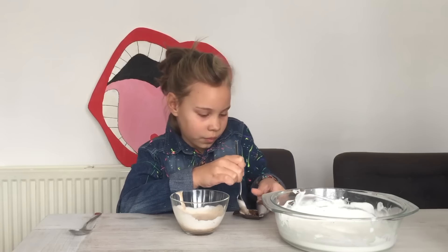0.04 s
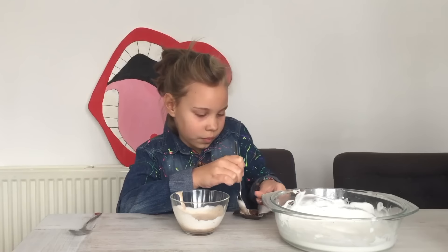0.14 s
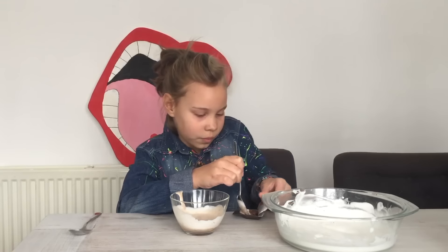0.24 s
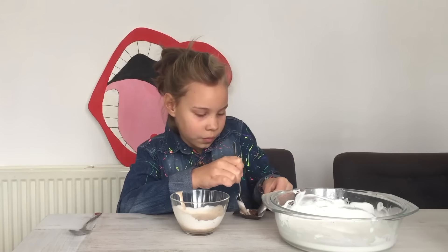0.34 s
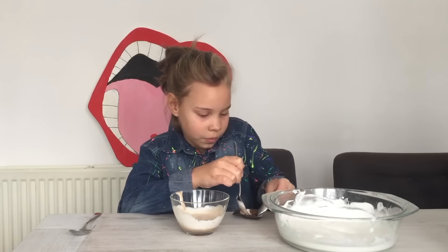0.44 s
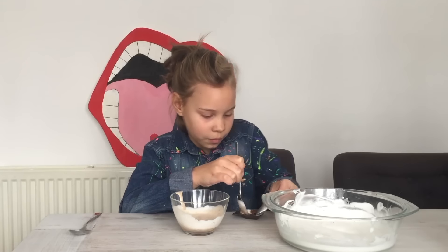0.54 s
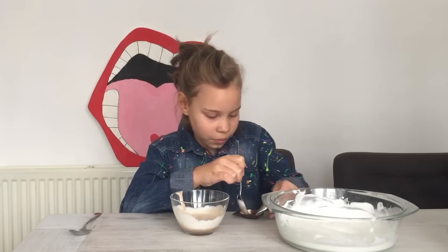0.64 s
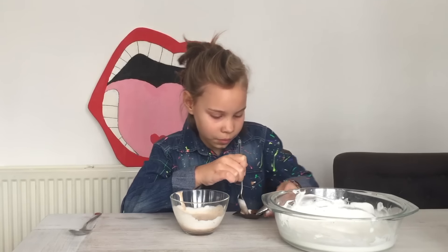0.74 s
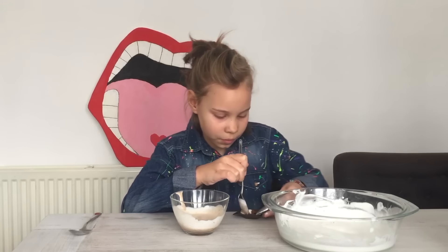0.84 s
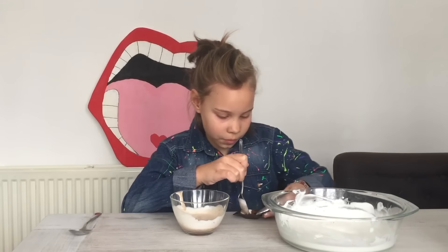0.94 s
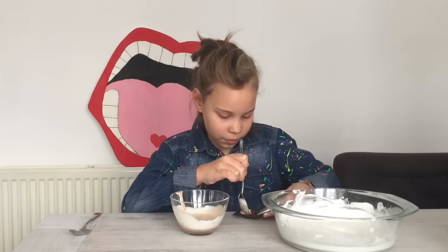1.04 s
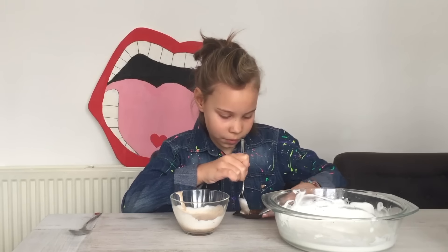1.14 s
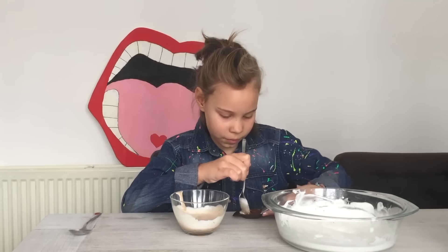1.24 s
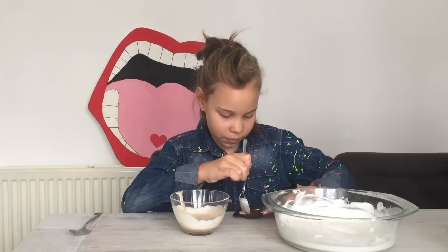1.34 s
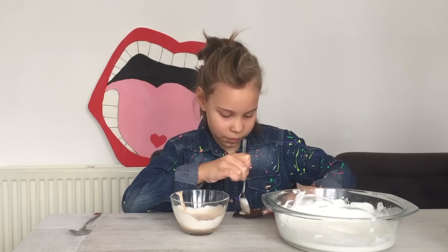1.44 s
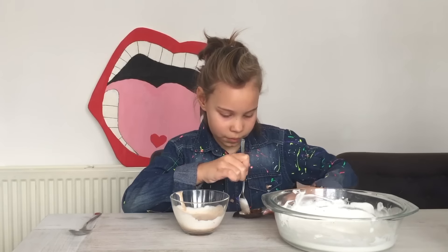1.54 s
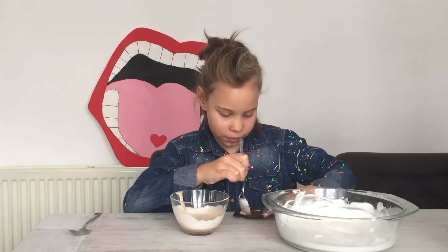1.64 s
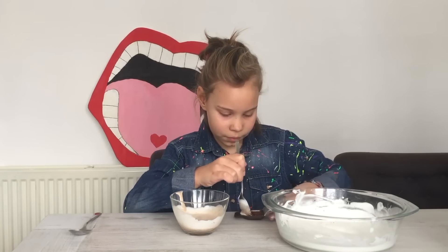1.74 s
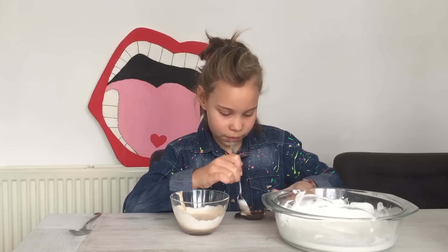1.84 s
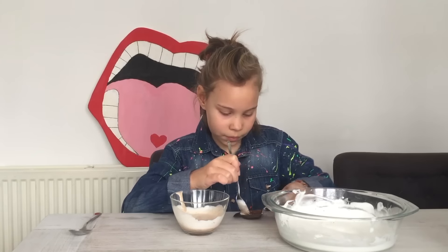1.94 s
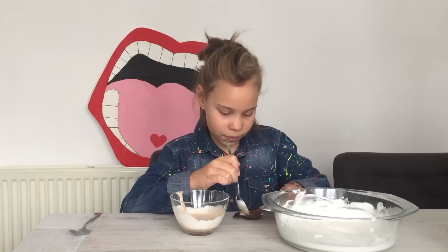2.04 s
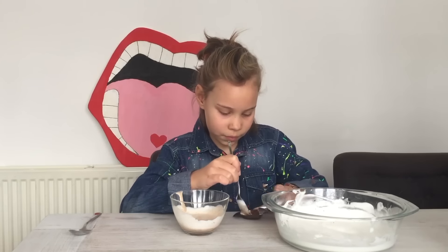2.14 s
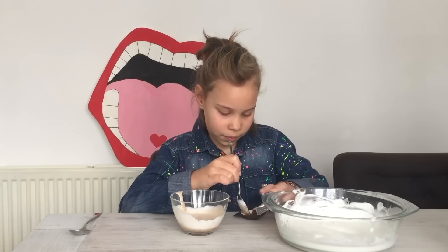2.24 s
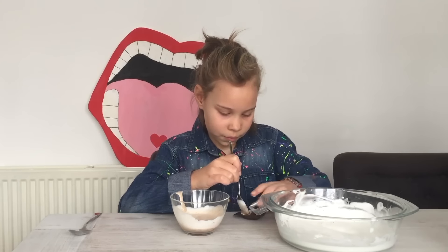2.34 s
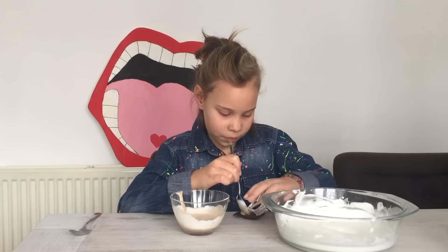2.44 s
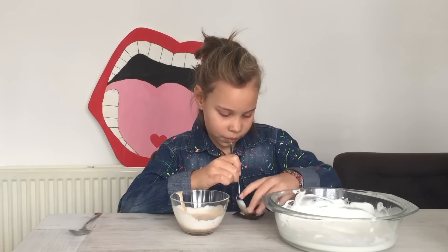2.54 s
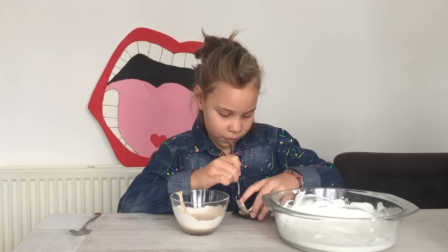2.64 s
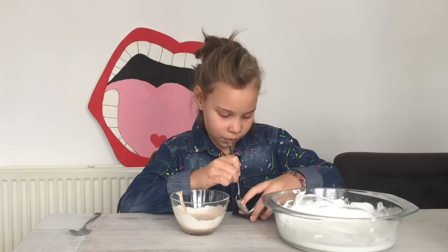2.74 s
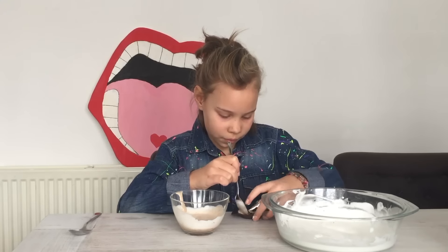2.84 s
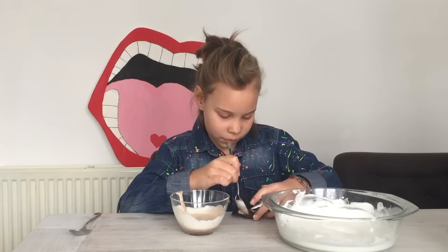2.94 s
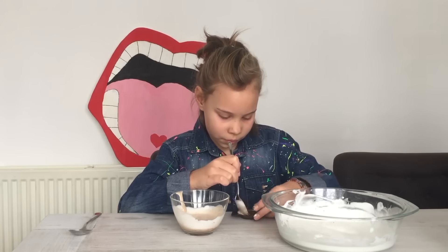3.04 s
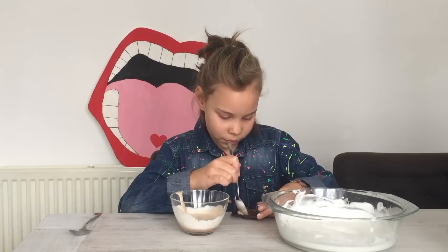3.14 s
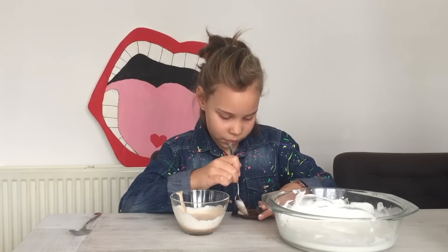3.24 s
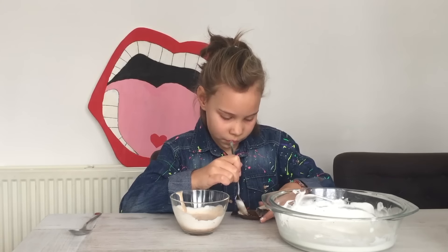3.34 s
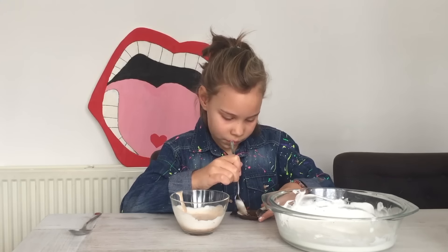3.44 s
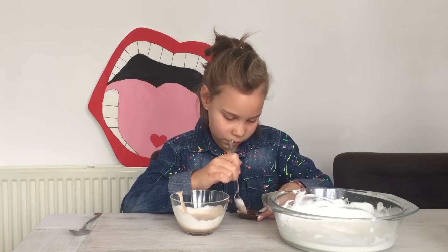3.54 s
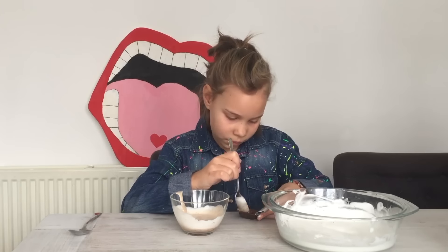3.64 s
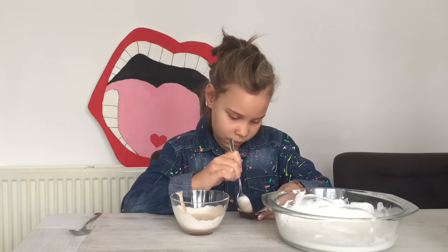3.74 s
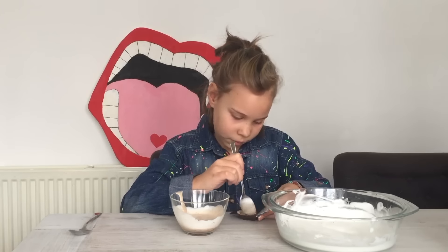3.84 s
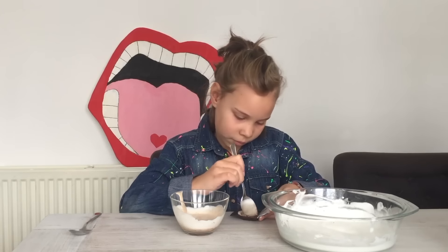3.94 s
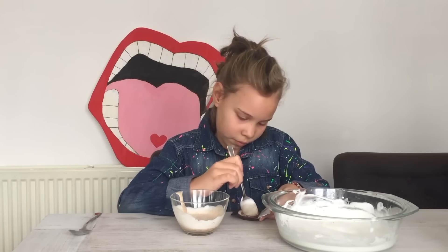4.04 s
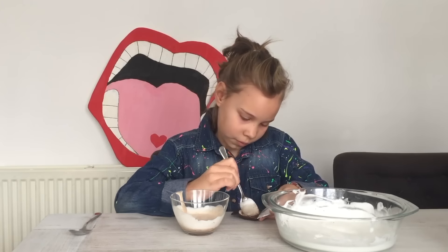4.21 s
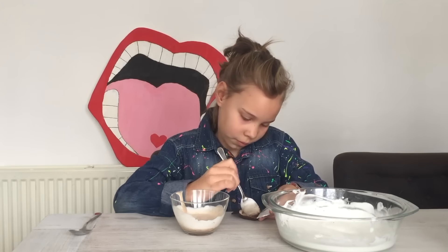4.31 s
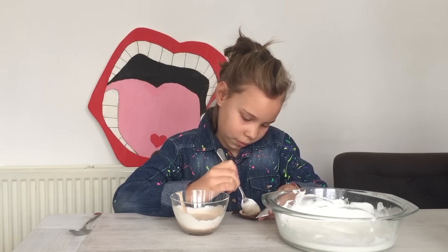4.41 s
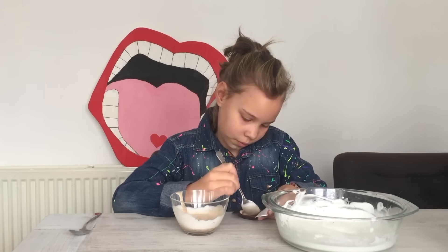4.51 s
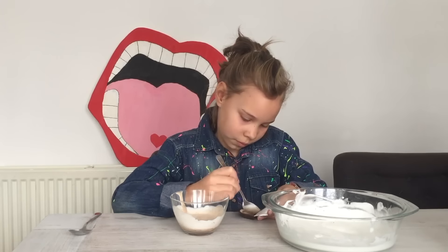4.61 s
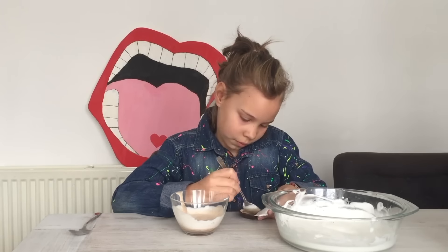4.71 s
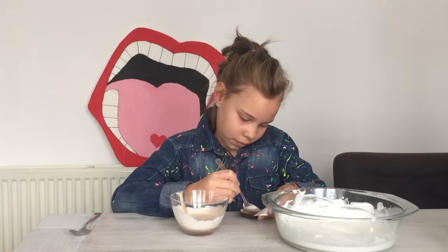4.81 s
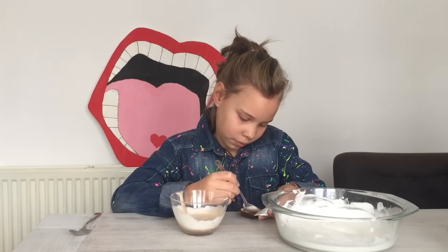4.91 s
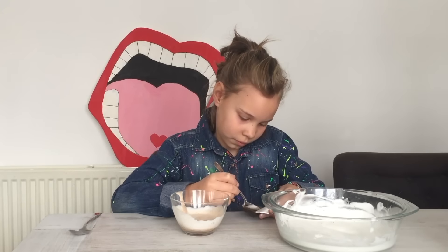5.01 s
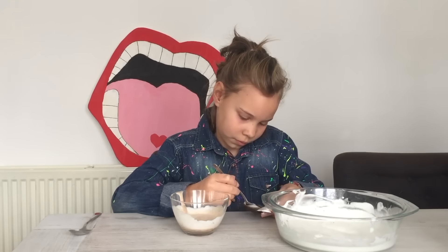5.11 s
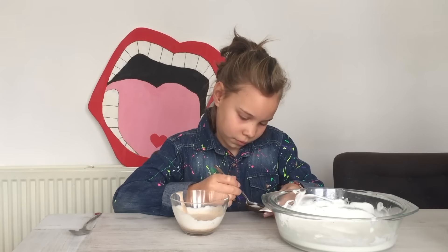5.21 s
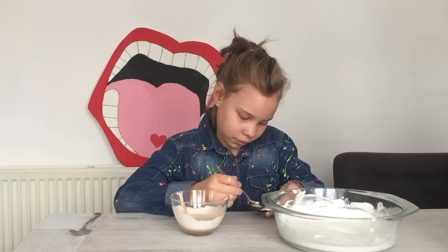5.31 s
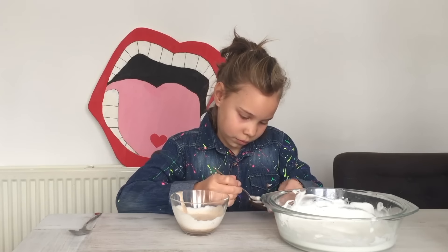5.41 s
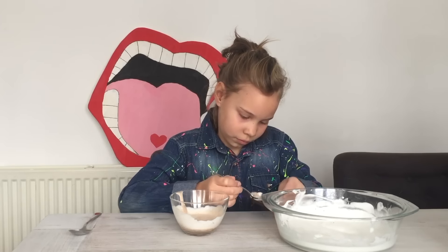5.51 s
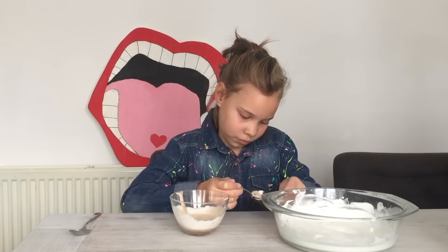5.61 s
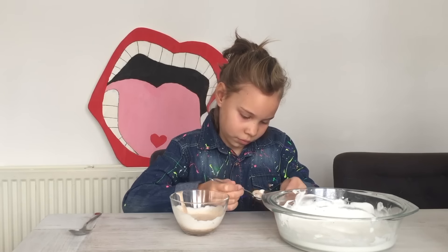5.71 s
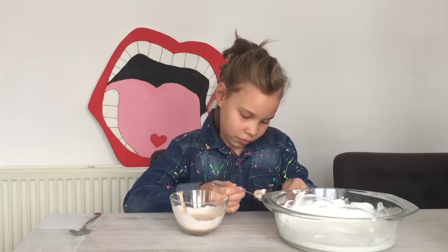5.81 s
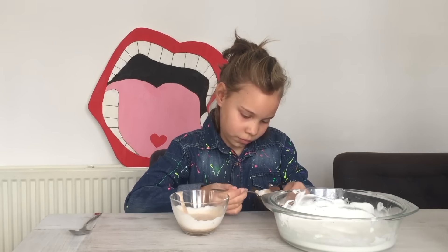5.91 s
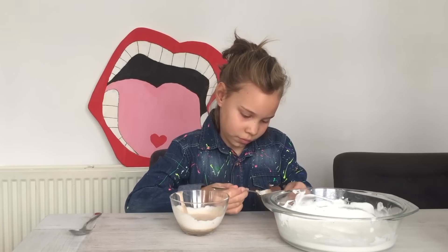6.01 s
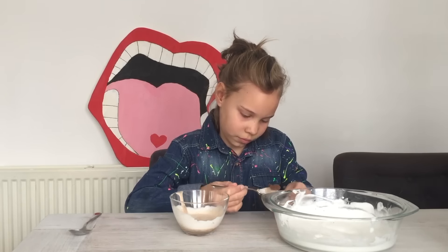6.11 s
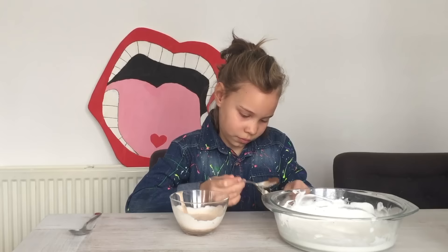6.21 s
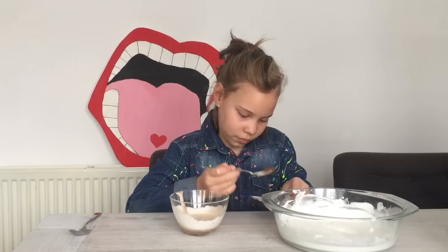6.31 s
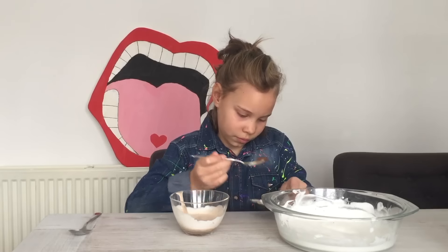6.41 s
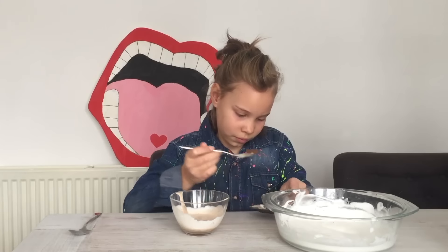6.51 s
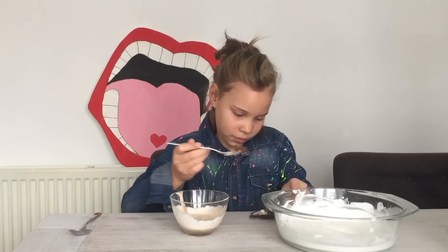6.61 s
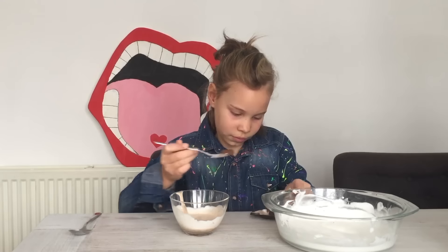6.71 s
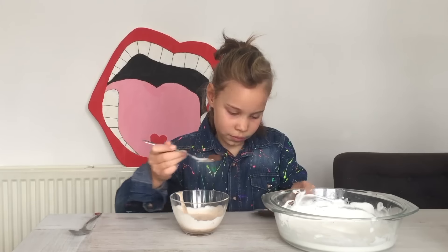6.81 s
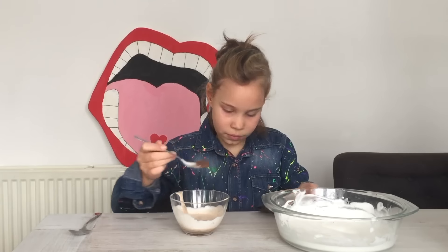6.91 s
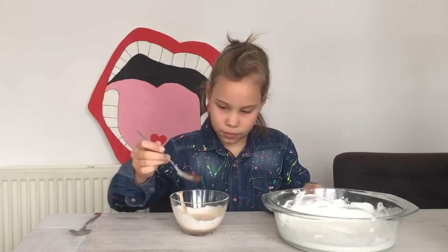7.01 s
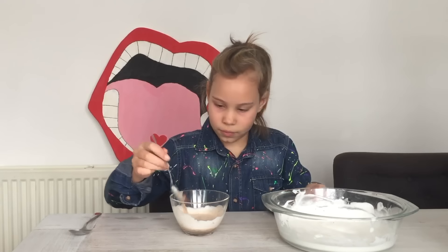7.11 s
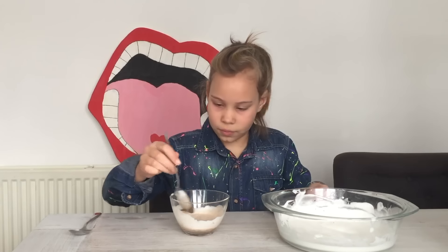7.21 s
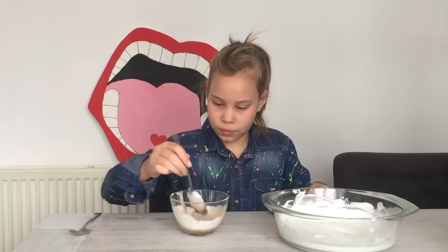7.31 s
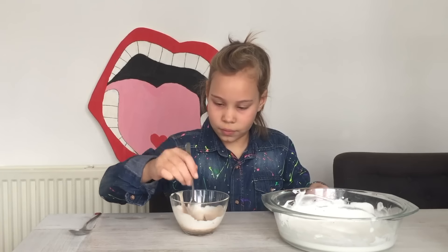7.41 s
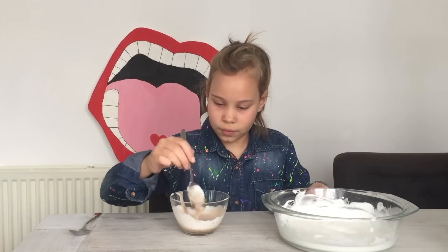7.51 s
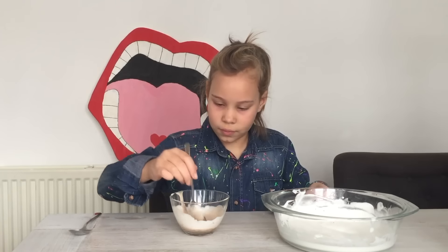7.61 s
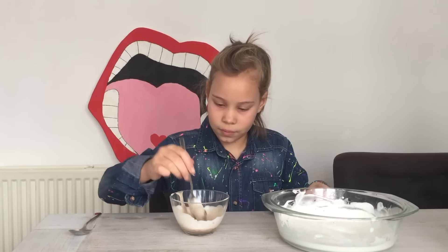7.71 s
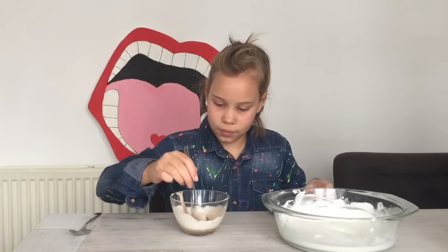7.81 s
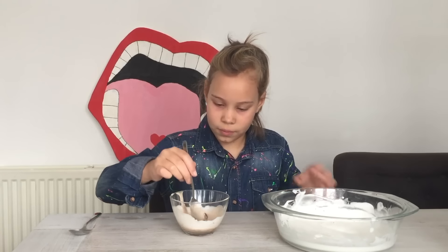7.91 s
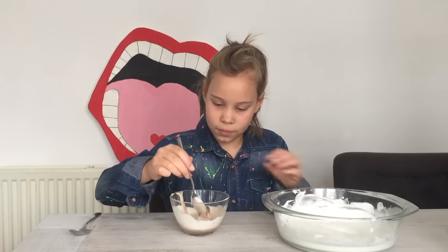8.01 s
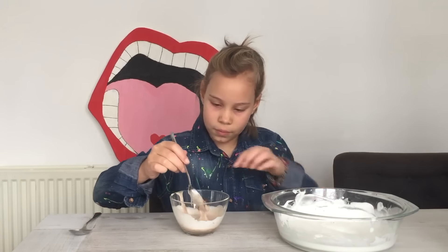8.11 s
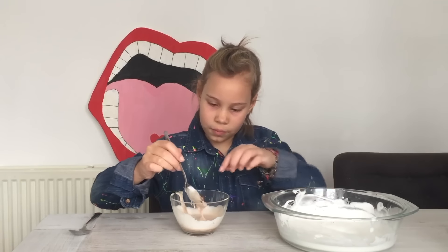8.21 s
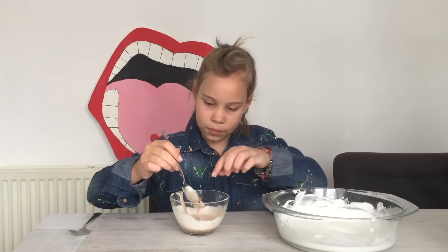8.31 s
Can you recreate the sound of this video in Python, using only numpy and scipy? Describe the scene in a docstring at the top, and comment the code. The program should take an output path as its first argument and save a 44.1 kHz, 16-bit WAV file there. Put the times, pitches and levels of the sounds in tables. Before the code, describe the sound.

A metal spoon crunches something brittle on a small dish, then clinks and knocks in a glass bowl.

```python
"""In a quiet room with a faint mains hum, a metal spoon crushes a brittle ingredient on a small dish:
crumbs grind and pieces snap, each fracture a brief burst of vibration. Partway through, a large glass
dish is brushed and rings in its modes. Later the small dish is nudged, and the table top resonates.
Last, the spoon carries a load to a glass bowl of thick mixture, clinks its side and knocks twice on
its bottom, exciting both the glass and the table."""
import sys
import numpy as np
from scipy import signal
from scipy.fft import rfft, irfft
from scipy.io import wavfile

SR = 44100
rng = np.random.default_rng(int(sys.argv[2]) if len(sys.argv) > 2 else 0)


def unload_audio(sound):
    """Save the sound as a 16-bit wav file, at the path given as the first command line argument."""
    columns = np.transpose(np.atleast_2d(sound))
    # keep every value between -1 and 1, then stretch to whole-number steps
    steps = np.round(np.clip(columns, -1, 1) * 32767)
    wavfile.write(sys.argv[1], SR, steps.astype(np.int16))


N = 368227
HZ = np.fft.rfftfreq(2048, 1 / SR) + 1  # frequency grid of the filter gains

# Mains harmonics. Each row: frequency in Hz, rms level in dB.
HUM_HARMONICS = [(50, -67.5), (100, -66), (150, -61), (350, -77), (400, -80.5), (450, -75.5), (600, -77)]
# Quiet air of the room. Each row: frequency in Hz, relative spectral density in dB.
AIR_SPECTRUM = [(20, -45), (32, -19), (50, -9), (105, -8), (160, -8.5), (320, -16.5), (480, -19),
                (840, -23), (1450, -19.5), (3400, -27.5), (4900, -29.5), (16000, -41.5)]
# Strokes of the spoon over crumbs. Each row: start and end in seconds, relative level in dB,
# treble tilt in dB per octave, swell in dB as the spoon bears down.
STROKES = [(0.147, 0.167, -40.5, 2, 14), (0.276, 0.421, -45, -3.3, 20), (0.938, 1.122, -47, 2, -8),
           (1.22, 1.316, -33, 0.5, 4), (1.408, 1.501, -40.5, 1.5, -1), (1.712, 1.809, -40, 1.7, 9),
           (1.864, 1.959, -42, -0.2, -2.5), (2.028, 2.084, -34, -2, 11.5), (2.436, 2.483, -38, -5, -1),
           (2.775, 2.898, -49, -7, -16), (3.1, 3.266, -41.5, 0.1, -2), (3.494, 3.516, -37.5, -4, -6),
           (3.568, 3.63, -35, 0, -12.5), (5.951, 6.002, -53.5, -2.5, 15), (6.322, 6.424, -47, 1, 7),
           (7.379, 7.468, -53.5, 0, -17)]
# Colour of grinding crumbs. Each row: frequency in Hz, relative spectral density in dB.
CRUMB_SPECTRUM = [(250, -44.5), (450, -21.5), (700, -4.5), (950, -12), (1300, -3), (1900, 1), (2900, -2),
                  (4900, -4.5), (5900, 1.5), (7600, -12), (16000, -11)]
# Snapping pieces and light spoon taps. Each row: time in seconds, relative level in dB,
# pitch in Hz, broadband brightness in dB.
FRACTURES = [(0.16, -30.5, 3300, -7), (0.2707, -39, 2660, -10), (0.3885, -29.5, 5200, -10),
             (0.4513, -32.5, 4700, -7), (0.5822, -46, 4700, -26), (0.9306, -34, 2700, -10),
             (0.956, -33, 3480, -10), (0.9997, -33.5, 1330, -13), (1.062, -32, 5130, -13),
             (1.0853, -29, 3270, 0), (1.1084, -30.5, 2470, 6), (1.1928, -33.5, 6074, -10),
             (1.215, -23, 2614, 22), (1.3185, -24, 1950, 12), (1.4154, -29, 2915, -9.5),
             (1.4907, -30, 1410, -25), (1.5486, -33, 2500, -9), (1.7186, -34, 2237, -35),
             (1.7392, -27, 2238, -11), (1.7943, -32, 5700, -27), (1.936, -30.5, 2686, -8),
             (2.1746, -33, 1879, -13), (2.3071, -42.5, 2520, -23), (2.3936, -38, 6305, -10),
             (2.436, -29, 3020, -29), (2.4462, -27, 1340, -12), (2.4796, -24.5, 3360, -16),
             (2.6648, -28.5, 1585, -41), (2.6696, -27.5, 2856, -40), (2.767, -37.5, 2232, 0),
             (3.1055, -27.5, 2208, -26), (3.164, -30, 5707, -25), (3.2506, -28, 3434, -8),
             (3.315, -38, 2800, -15), (3.4985, -32, 2238, 1), (3.5046, -29, 3244, -23),
             (3.5682, -26.5, 2560, -13), (3.6672, -30, 3040, -35), (3.787, -30.5, 9140, 12),
             (3.833, -32.5, 3020, -11.5), (3.9694, -43.5, 2730, -37), (4.0686, -41, 2000, -44),
             (4.1598, -35.5, 3440, 0), (4.2385, -35.5, 2690, -16), (4.331, -34, 3030, -7),
             (4.3668, -40, 2970, -20), (4.4137, -36.5, 3050, -15), (4.5975, -22, 3580, -9),
             (4.5986, -31, 1460, -15), (4.7108, -17.5, 2800, -41), (4.8111, -31, 3050, -16.5),
             (4.913, -30.5, 2500, -19), (5.059, -33.5, 3120, -9), (5.2388, -48, 11700, -20),
             (5.3103, -39, 2400, -40), (5.3867, -30.5, 8700, -11), (5.6312, -46.5, 7300, -18),
             (5.999, -30.5, 3154, -9), (6.3507, -31.5, 3072, -32), (6.4095, -36, 2852, -15),
             (6.7124, -30, 3550, -41), (7.417, -40, 3180, -18), (7.5153, -44.5, 3250, -5)]
# Modes of the large glass dish. Each row: frequency in Hz, relative level in dB, t60 in seconds.
DISH_MODES = [(551.5, -1, .22), (1328, -4.5, 0.15), (1424, 0, 0.48), (2340, -12, 0.44), (2850, -16, 0.23),
              (3540, -7, 0.13)]
# Knocks through a dish into the table. Each row: start in seconds, relative level in dB,
# upper edge in Hz (higher for a harder contact).
TABLE_KNOCKS = [(2.312, -39.5, 300), (6.707, -35.5, 715), (7.103, -49, 790), (7.2416, -33, 2550),
                (7.711, -18.5, 2330), (7.8579, -13, 14000)]
# Resonances of a knock: table top below 3 kHz, spoon and glass above.
# Each row: frequency in Hz, nominal width in Hz, relative level in dB.
KNOCK_RESONANCES = [(200, 87, -5), (242.5, 42, -1.5), (329, 40.4, -3), (426, 91, -8.5), (585, 87, -3),
                    (708, 75, -2.5), (891, 121, -1.5), (1245, 137, -1.5), (1547, 170, -3.5),
                    (1970, 470, -7.5), (2430, 430, -14.5), (2790, 300, -12.5), (3760, 176, -4.5),
                    (4120, 210, -10.5), (5200, 310, -25.5), (5800, 200, -19.5), (6710, 380, -14.5),
                    (8980, 310, -20), (9700, 550, -31), (12800, 280, -24), (14750, 340, -24),
                    (15400, 280, -27)]
# Blows of the spoon on the bowl. Each row: start in seconds, relative ring and tick levels in dB,
# tilt of the ring in dB per octave.
BOWL_BLOWS = [(7.241, -13.5, -28.5, -2), (7.7107, -42.5, -34, 6), (7.8581, -25, -19.5, -11)]
# Modes of the glass bowl. Each row: frequency in Hz, relative level in dB, t60 in seconds.
BOWL_MODES = [(1276.7, -1.5, 0.33), (1394, -21, .19), (2487, -12, 0.18), (4011, -19, 0.17),
              (4245, 0, 0.064), (6450, -12.5, 0.077), (6480, -5.5, 0.081), (8900, -34, 0.126),
              (12000, -26, 0.11), (14500, -30.5, .16), (15400, -20, .12)]
# Reverberation times. Each row: frequency in Hz, t60 in seconds.
ROOM_DECAY = [(150, 0.43), (600, 0.27), (2000, 0.31), (4000, 0.29), (8000, 0.25), (16000, 0.13)]
# Early reflections. Each row: delay in seconds, relative level in dB.
REFLECTIONS = [(.0021, -12.5), (.0067, -10.5), (.0087, -12.5), (0.0099, -13)]


def gain_of(db):
    """Amplitude grows tenfold for every 20 dB."""
    return 10 ** (np.asarray(db) / 20)


def curve_at(points, hz):
    """Linear interpolation of (Hz, value) points on a log-frequency axis."""
    f, value = np.transpose(points)
    return np.interp(np.log(hz + 1), np.log(f + 1), value)


def add(mix, start_s, sound):
    """Superposition: a sound adds to the mix from start_s on."""
    part = mix[round(start_s * SR):][:len(sound)]
    part += sound[:len(part)]


def colour(x, gain):
    """Minimum-phase filtering: the phase follows from the log gain by the Hilbert transform."""
    log_gain = np.log(np.maximum(np.r_[gain, gain[-2:0:-1]], 1e-5))
    taps = np.fft.ifft(np.exp(np.conj(signal.hilbert(log_gain)))).real
    return signal.fftconvolve(x, taps)


def burst(t60, gain, span_s, rise_s=1e-5, size=8192):
    """Dense, exponentially damped vibration with the energy of rms 1 held for span_s."""
    t = np.arange(size) / SR
    fade = gain_of(-60 * t / t60) * (1 - np.exp(-(t / rise_s) ** 2))
    spectrum = rfft(rng.standard_normal(size) * fade)
    whitened = irfft(spectrum / (abs(spectrum) + 1e-12))
    x = colour(whitened * np.sqrt(fade), gain)
    return x * np.sqrt(span_s * SR / np.sum(x ** 2))


def lowpass(hz, order=1):
    """Butterworth gain, falling above hz."""
    return 1 / np.hypot(1, (HZ / hz) ** order)


def highpass(hz, order):
    """Butterworth gain, falling below hz."""
    return 1 / np.hypot(1, (hz / HZ) ** order)


def resonance(hz, q):
    """Frequency response of one damped oscillator."""
    return 1 / np.hypot(1, q * (HZ / hz - hz / HZ))


def facets(depth_db, count=34):
    """Shape sets the spectrum: each fragment has its own chance peaks and dips."""
    knots = np.linspace(0, np.sqrt(HZ[-1]), count)
    return gain_of(depth_db * np.interp(np.sqrt(HZ), knots, rng.uniform(-2.1, 2.2, count)))


def room(x, echo_db=0):
    """Reverberation: a few wall reflections, then a diffuse tail whose treble dies first."""
    t = np.arange(SR * 3 // 4) / SR
    onset = np.clip((t - .005) / .0024, 0, 1)
    taps = rng.choice([-1., 1.], len(t)) * (rng.random(len(t)) < .2) * onset
    hz, when, spectra = signal.stft(taps, SR, nperseg=256)
    decay = gain_of(-60 * when / curve_at(ROOM_DECAY, hz)[:, None])
    tail = signal.istft(spectra * decay, SR, nperseg=256)[1]
    tail /= np.linalg.norm(tail)
    for delay, db in REFLECTIONS:
        tail[round(delay * SR)] += gain_of(db + echo_db)
    return signal.fftconvolve(x, tail)[:N]


def hum_and_air(waver_db=3.5, air_db=-59):
    """A wavering harmonic series on the mains frequency lies over steady broadband air noise."""
    t = np.arange(N) / SR
    knots = np.linspace(0, t[-1], 40)
    hum = np.zeros(N)
    for hz, db in HUM_HARMONICS:
        waver = waver_db * np.interp(t, knots, rng.standard_normal(len(knots)))
        hum += gain_of(db + waver) * np.sin(2 * np.pi * (hz * t + rng.random()))
    air_gain = gain_of(curve_at(AIR_SPECTRUM, np.fft.rfftfreq(N, 1 / SR)))
    air = irfft(rfft(rng.standard_normal(N)) * air_gain, N)
    return np.sqrt(2) * hum + gain_of(air_db) * air / np.sqrt(np.mean(air ** 2))


def grinding(crumbs_per_s=230, spread_db=4.5, crumb_t60=.008, contact_hz=2000):
    """Successive fracture: crumbs break in turn, and the contact resonance drifts as the spoon rolls."""
    out = np.zeros(N)
    for start, end, db, tilt_db, swell_db in STROKES:
        length = end - start
        treble_tilt = tilt_db * np.log2(np.maximum(HZ, 1000) / 3000)
        spectrum = gain_of(curve_at(CRUMB_SPECTRUM, HZ) + treble_tilt)
        stroke = np.zeros(round(length * SR) + len(HZ))
        count = max(round(crumbs_per_s * length), 2)
        drift_phase = 2 * np.pi * rng.random() + np.cumsum(rng.normal(.12, .24, count))
        pitch = contact_hz * np.exp(.5 * np.sin(drift_phase))
        for k, (jitter, size) in enumerate(rng.random((count, 2))):
            size_db = spread_db * min(-np.log(size), 3) + swell_db * k / count  # most are small
            contact = np.hypot(1, gain_of(7) * resonance(pitch[k], q=7))
            gain = spectrum * facets(depth_db=6.5) * contact
            crumb = burst(crumb_t60, gain, span_s=.002, rise_s=.00024, size=1024)
            add(stroke, (k + jitter) / count * length, gain_of(size_db) * crumb)
        add(out, start, gain_of(db) * stroke * np.sqrt(length * SR / np.sum(stroke ** 2)))
    return gain_of(-4) * out + gain_of(-5.5) * room(out)


def chips(per_s=25, above_db=2, spread_db=4, typical_hz=2380, spread_octaves=.65, bright_db=-13):
    """Random fracture sheds chips in each stroke, as loud as the spoon presses; rows as in FRACTURES."""
    rows = []
    for start, end, db, _, swell_db in STROKES:
        count = min(round(per_s * (end - start)), 10)
        for k, (jitter, size, pitch) in enumerate(rng.uniform(-1, 1, (10, 3))[:count]):
            progress = (k + .5 + jitter / 2) / count
            level_db = db + swell_db * (progress - .5) + above_db + spread_db * size
            hz = typical_hz * 2 ** (spread_octaves * pitch)
            rows.append((start + progress * (end - start), level_db, hz, bright_db))
    return rows


def snaps(yield_s=.007, rise_s=.0005, crack_t60=.0052, ring_t60=.054):
    """Brittle fracture: a piece yields with a faint crackle, cracks, then rings briefly at its pitch."""
    crackles, cracks = np.zeros((2, N))
    for s, db, hz, bright_db in FRACTURES + chips():
        bass_loss = highpass(.53 * hz, 3) * highpass(800, 3)  # small pieces radiate no bass
        radiated = facets(depth_db=2.5) * bass_loss * lowpass(15000, 2)
        crack_gain = np.hypot(resonance(hz, q=3.6), gain_of(bright_db)) * radiated
        ring_gain = np.hypot(resonance(hz, q=6.5), gain_of(bright_db) / 2) * radiated
        ring_gain *= facets(depth_db=5)
        crack = burst(crack_t60, crack_gain, .0019, rise_s, size=2048)
        ring = burst(ring_t60, ring_gain, .003, rise_s, size=2048)
        crackle = burst(ring_t60, crack_gain, .0059, yield_s / 2, size=2048)
        add(crackles, s - yield_s, gain_of(db - 20) * crackle)
        add(cracks, s - rise_s, gain_of(db) * (crack + gain_of(-9) * ring))
    return gain_of(.37) * (crackles + cracks) + gain_of(-3) * room(cracks)


def modal_ring(modes, tilt_db=0):
    """Free vibration is a sum of damped sinusoids; tilt_db makes the ring brighter or duller."""
    t = np.arange(SR) / SR
    out = np.zeros(SR)
    for hz, db, t60 in modes:
        envelope = gain_of(db + tilt_db * np.log2(hz / 1500) - 60 * t / t60)
        out += envelope * rng.choice([-1, 1]) * np.sin(2 * np.pi * hz * t)
    return out


def glass_dish(start_s=2.3115):
    """A soft touch weakly excites the normal modes of the large dish."""
    ring = np.zeros(N)
    add(ring, start_s, modal_ring(DISH_MODES))
    return gain_of(-40.5) * ring + gain_of(-46.5) * room(ring)


def knock_spectrum(sharpness, valley_db=-38):
    """Resonance peaks add in power; the table radiates little deep bass."""
    power = sum(gain_of(db) ** 2 / (1 + sharpness * ((HZ - hz) / width) ** 2) ** 2
                for hz, width, db in KNOCK_RESONANCES)
    return np.sqrt(power + gain_of(valley_db) ** 2) * highpass(160, 3)


def table_knocks(blow_t60=.035, ring_t60=.47, rebound_t60=.038, rebound_s=.0088):
    """All knocks share one impulse response: a blow, a dull rebound and a narrower, longer ring."""
    gain = knock_spectrum(sharpness=1.5)
    blow = burst(blow_t60, gain, span_s=.011, rise_s=.00026)
    ring = burst(ring_t60, knock_spectrum(sharpness=1.8, valley_db=-45), span_s=.0077)
    response = blow + gain_of(-7) * ring
    add(response, rebound_s, burst(rebound_t60, gain * lowpass(1000, 2), span_s=.0051))
    out = np.zeros(N)
    for s, db, edge_hz in TABLE_KNOCKS:
        softness = lowpass(edge_hz) * lowpass(7 * edge_hz)
        add(out, s, gain_of(db) * colour(response, softness))
    return gain_of(.5) * out + gain_of(-4.5) * room(out, echo_db=-16)


def glass_bowl(tick_t60=.017):
    """Impact excitation: each blow of the spoon gives a contact tick and sets the bowl's modes ringing."""
    rings, ticks = np.zeros((2, N))
    contact = highpass(1200, 2) * lowpass(4500)
    for s, ring_db, tick_db, tilt_db in BOWL_BLOWS:
        add(rings, s, gain_of(ring_db) * modal_ring(BOWL_MODES, tilt_db))
        add(ticks, s, gain_of(tick_db) * burst(tick_t60, contact, span_s=.0018, rise_s=.00033))
    return gain_of(-2.5) * rings + ticks + room(gain_of(-8.5) * rings + gain_of(-2) * ticks)


def scene():
    """The sources superpose in one channel."""
    return (hum_and_air() + grinding() + snaps() + glass_dish() + table_knocks() + glass_bowl())[None]


def record(dry, ceiling=.92, edge_hz=16100):
    """Hard limiting caps any peak above the ceiling; a low-pass filter then limits the band."""
    taps = signal.firwin(301, edge_hz, window=("kaiser", 8), fs=SR)
    return signal.oaconvolve(np.clip(dry, -ceiling, ceiling), taps[None], "same")


dry = scene()
out = record(dry)
unload_audio(out)
```